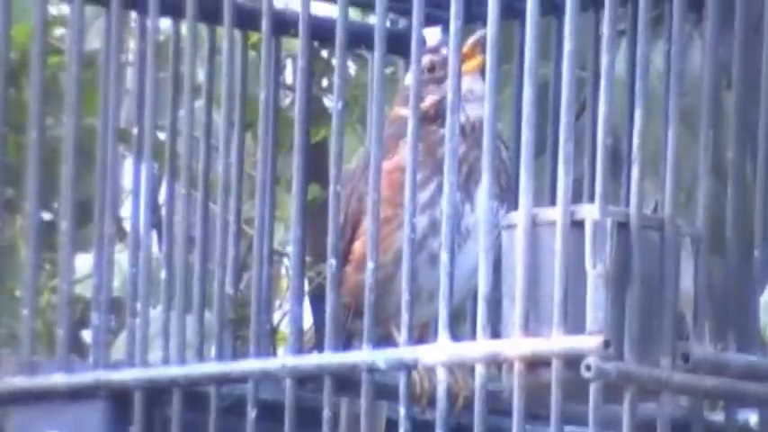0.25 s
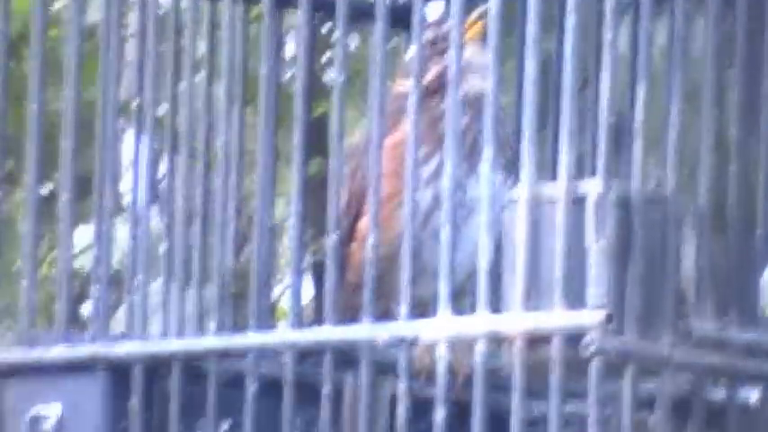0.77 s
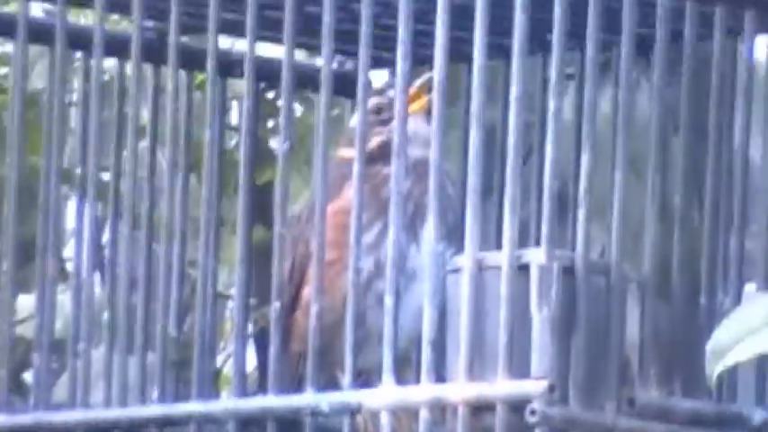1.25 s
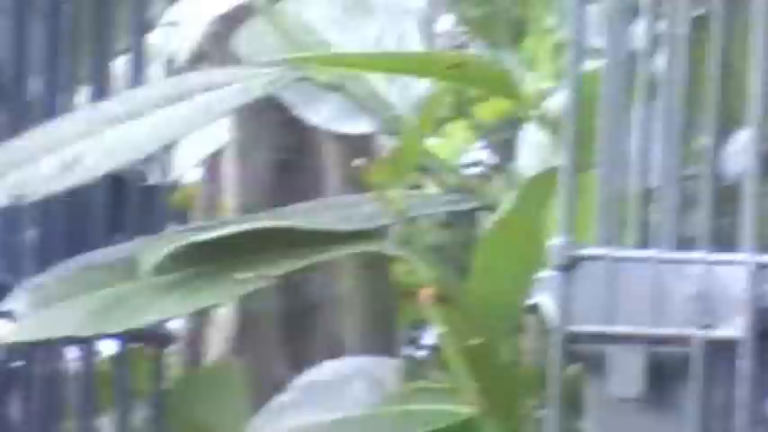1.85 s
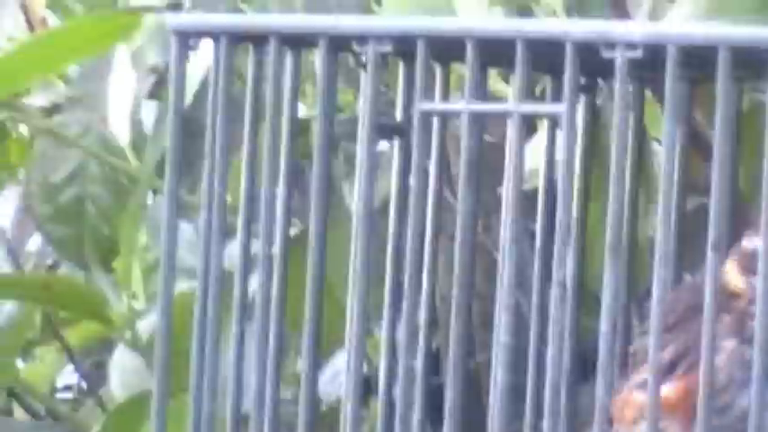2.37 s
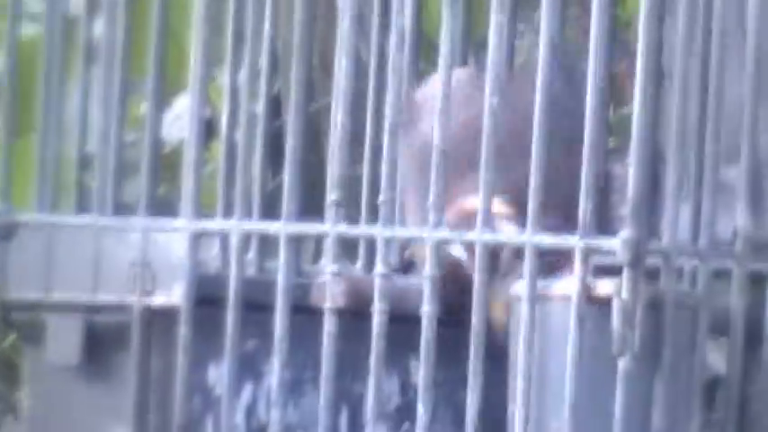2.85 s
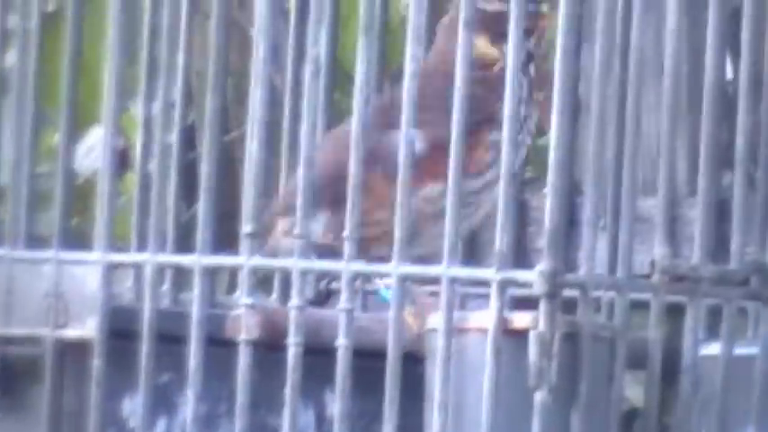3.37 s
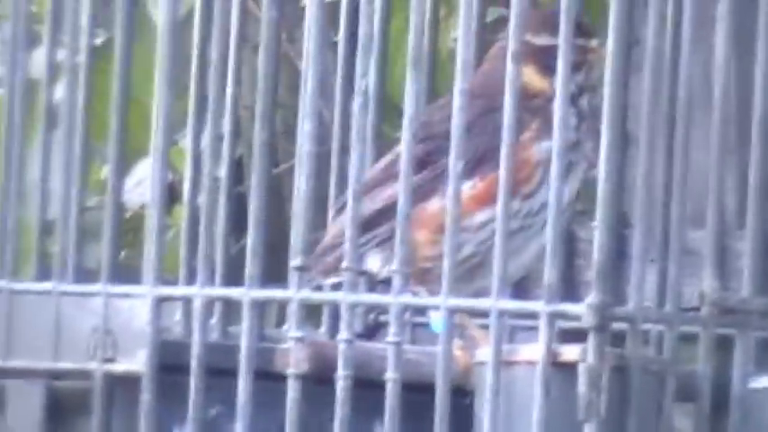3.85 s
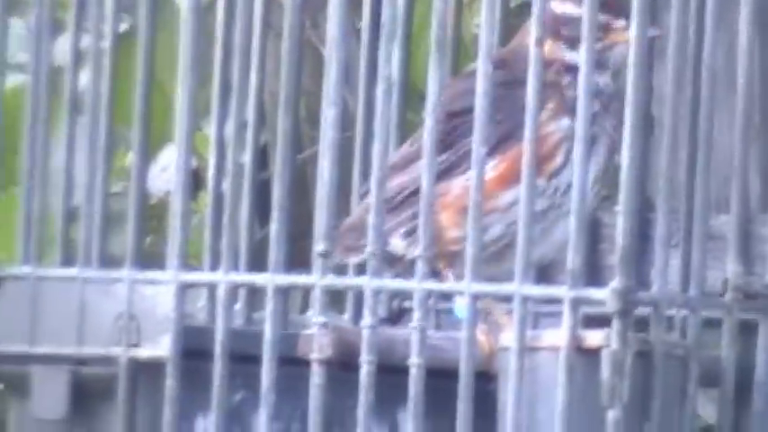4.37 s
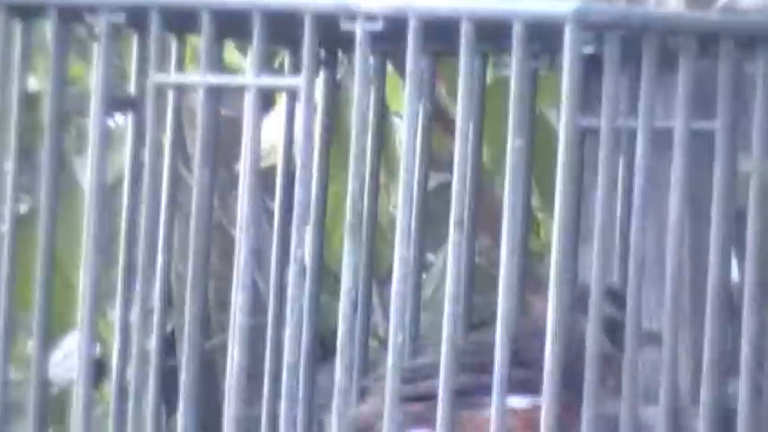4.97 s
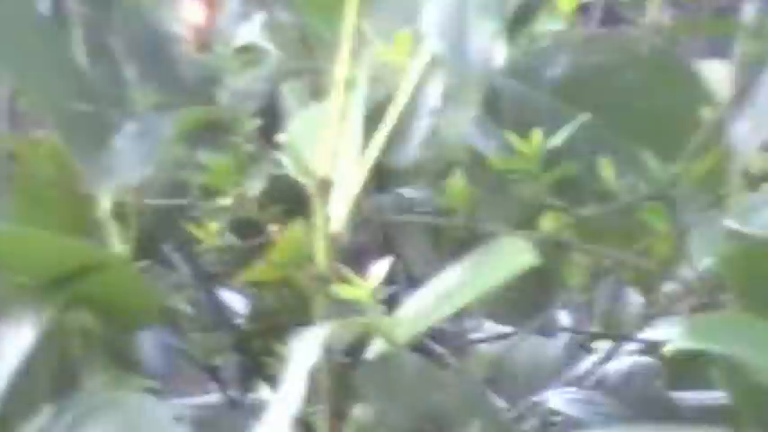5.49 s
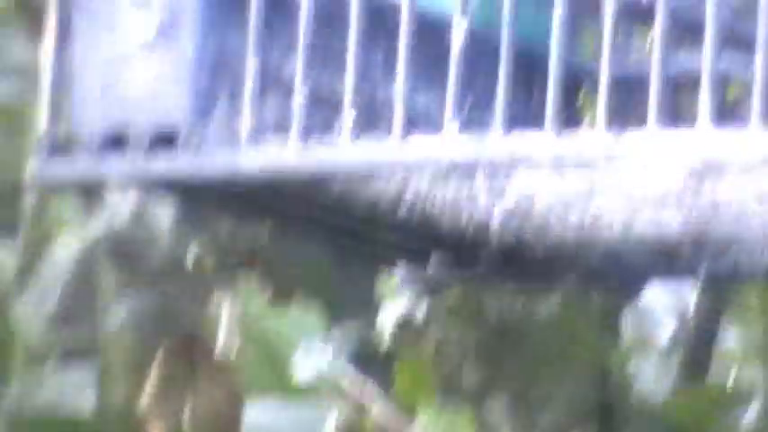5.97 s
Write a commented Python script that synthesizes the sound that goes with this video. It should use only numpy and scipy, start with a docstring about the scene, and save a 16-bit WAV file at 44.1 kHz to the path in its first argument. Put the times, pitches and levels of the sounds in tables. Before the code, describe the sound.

Caged thrushes among leaves near hard walls. A nasal call opens fast, squeaky, rasping twittering; a falling series of fluttering whistles joins after one second. A low purr breaks into pulses, claws tick on ringing wires, then a near-silent gap. A brief high looping trill, a distant chirp, and a louder, clearer falling whistle phrase follow. Close microphone, short echoes, faint rumble and hiss.

```python
"""A nasal call opens over a faint steady rumble and hiss: caged thrushes among leaves, close to hard walls.
One twitters fast, both sides of its syrinx gliding at once and modulating each other; then it purrs.
Two falling phrases of scooped whistles ring out, with a high looping trill between them.
Ringing wires tick under claws; a filtered-noise drone swells far off and one distant chirp answers.
Echoes and decaying noise tails place birds and cage near leaves and walls."""
import sys
import numpy as np
from scipy import signal
from scipy.fft import rfft, irfft
from scipy.io import wavfile
from scipy.ndimage import uniform_filter1d

SR = 44100
rng = np.random.default_rng(int(sys.argv[2]) if len(sys.argv) > 2 else 0)


def output_pcm(signal):
    """Save a mono or channel-first signal as 16-bit PCM at the path in sys.argv[1].

    Samples are clipped to [-1, 1] before scaling.
    """
    pcm = np.clip(np.atleast_2d(signal).T, -1, 1) * 32767
    wavfile.write(sys.argv[1], SR, np.round(pcm).astype(np.int16))


N = 274743
TIME = np.arange(N) / SR
CUTOFF_HZ = 15700
STEADY = np.zeros(N)   # no bend, no wobble


def from_db(db):
    """Decibels to gain."""
    return 10 ** (np.asarray(db) / 20)


def rms_one(x):
    """Scale to unit rms."""
    return x / np.sqrt(np.mean(x ** 2) + 1e-20)


def at_hz(points, hz):
    """Read a spectrum on a log-frequency axis."""
    freqs, values = np.transpose(points)
    return np.interp(np.log(np.maximum(hz, 1)), np.log(freqs), values)


def butter(order, hz, kind, x):
    """Shape a sound with a Butterworth filter."""
    return signal.sosfilt(signal.butter(order, hz, kind, fs=SR, output="sos"), x)


def drift(rate_hz):
    """Random wavering up to the given rate; spread 1."""
    noise = rng.standard_normal(N + 4000)
    return rms_one(butter(2, min(rate_hz, 5000), "low", noise)[4000:])   # skip the filter's start


def zigzag(rate_hz, unevenness=.3):
    """Muscle flutter: quick, uneven sweeps up and down."""
    uneven_rate_hz = rate_hz * np.exp(unevenness * drift(rate_hz))
    return np.sin(2 * np.pi * np.cumsum(uneven_rate_hz) / SR)


# how well throat and beak pass each partial: (frequency [Hz], level [dB])
THROAT_AND_BEAK = [(1600, -2.5), (2200, -6.5), (2800, 1.5), (5200, -3.5), (7500, 1), (8500, -1.5),
                   (10000, -14.5), (12000, -20), (15500, -33)]
# second to fifth partial, before each note's own overtone level: (level [dB])
PARTIALS_DB = [3, -1.5, -6.5, -9.5]


def syrinx(hz, level_db, overtone_db, even_db=0):
    """A vibrating membrane: a tone and overtones through throat and beak; a symmetric swing weakens even ones."""
    phase = 2 * np.pi * np.cumsum(hz) / SR
    out = from_db(at_hz(THROAT_AND_BEAK, hz)) * np.sin(phase)
    for k, db in enumerate(PARTIALS_DB, 2):
        partial_db = overtone_db + db + even_db * (k % 2 == 0) + at_hz(THROAT_AND_BEAK, k * hz)
        out += from_db(partial_db) * np.sin(k * phase) * (k * hz < CUTOFF_HZ)
    return np.sqrt(2) * from_db(level_db) * out


def add(out, start, end, hz0, hz1, db, swell_db, overtone_db, bend, wobble_db,
        even_db=0, arch=0, edge_s=0.0022):
    """Add one gliding note; arch lowers both ends, bend (log pitch) and wobble_db move it moment by moment."""
    span = slice(max(0, int((start - edge_s) * SR)), int((end + edge_s) * SR))
    t = TIME[span]
    along = np.clip((t - start) / (end - start), 0, 1)
    from_edge = np.minimum(t - start, end - t) + edge_s
    gate = np.sin(np.pi / 2 * np.clip(from_edge / (2 * edge_s), 0, 1)) ** 2
    hz = (hz0 + (hz1 - hz0) * along) * np.exp(bend[span] - arch * (2 * along - 1) ** 2)
    level_db = db + swell_db * (along - .5) + wobble_db[span]
    out[span] += gate * syrinx(hz, level_db, np.broadcast_to(overtone_db, N)[span], even_db)


# background spectrum, relative: (frequency [Hz], level [dB per Hz])
AIR_SPECTRUM = [(15, -43.5), (30, -14.5), (70, -2.5), (112, -5), (170, -2.5), (330, -10), (780, -6),
                (1500, -15.5), (2100, -17.5), (4500, -22.5), (7300, -21.5), (9000, -38), (12000, -45.5),
                (15500, -64)]
# how alike left and right are: (frequency [Hz], correlation [-1 to 1])
AIR_WIDTH = [(40, 0.94), (300, 0.011), (700, 0.31), (7000, 0.79)]


def air(level_db=-51):
    """Steady distant rumble and faint hiss: shaped noise, widest in the low middle."""
    hz = np.fft.rfftfreq(N, 1 / SR)
    mid, side = rfft(rng.standard_normal((2, N))) * from_db(at_hz(AIR_SPECTRUM, hz))
    alike = np.clip(at_hz(AIR_WIDTH, hz), -1, 1)
    stereo = np.sqrt(1 + alike) * mid + np.sqrt(1 - alike) * side * [[1], [-1]]
    return from_db(level_db) * rms_one(irfft(stereo, N))


def twitter(coupling=2.4):
    """Both sides of the syrinx sound at once and modulate each other into sum and difference tones."""
    rasps, flicks = rattles()
    low = rasps + soft_notes() + squawk() + purr()
    high = flicks + thin_notes()
    return low + high + coupling * butter(2, 8000, "low", low * high)


# nasal notes, pitches before the arch: (start [s], end [s], start pitch [Hz], end pitch [Hz],
# level [dB], swell [dB], undertone re note [dB], overtones [dB])
NASAL_CALLS = [(-.01, 0.028, 3957, 3704, -27, -8.5, -17.5, -15.5),
               (0.321, 0.482, 3348, 3323, -36, -2.5, -18, -17),
               (2.596, 2.712, 4084, 4177, -37.5, 17, -6.5, -24)]
# soft slurs, pitches before the arch: (start [s], end [s], start pitch [Hz], end pitch [Hz],
# mid-note level [dB], arch [log pitch, about share of pitch; below 0 it dips])
SOFT_SLURS = [(0.093, 0.133, 2820, 2640, -36.5, 0.016), (0.203, 0.217, 2820, 2800, -36.5, 0.052),
              (0.307, 0.486, 4534, 4895, -42.5, 0.011), (0.476, 0.541, 4974, 4960, -34.5, 0.019),
              (0.711, 0.749, 3600, 3290, -38, 0), (0.75, 0.855, 3222, 3050, -35.5, -0.035),
              (0.822, 0.915, 4660, 5000, -39.5, 0.047), (0.871, 0.932, 3600, 3764, -37.5, -0.12),
              (0.929, 0.993, 4337, 4260, -36, 0.051), (1.102, 1.199, 2760, 2667, -39, .06),
              (1.236, 1.352, 3663, 3575, -35, 0.031), (1.285, 1.353, 6340, 6400, -43.5, -0.013),
              (1.356, 1.428, 3856, 4110, -36.5, 0.034), (1.722, 1.795, 5710, 4650, -44.5, -.05)]


def soft_notes(jitter=0.013, shimmer_db=2.0, nasal_arch=0.0217, undertone_overtone_db=-14):
    """The lower side sings curved slurs; in nasal notes every second swing differs: an undertone an octave down."""
    out, shake, shimmer = np.zeros(N), jitter * drift(230), shimmer_db * drift(280)
    for *note, arch in SOFT_SLURS:
        add(out, *note, -5.5, -13, shake, shimmer, arch=arch, edge_s=0.0044)   # fades; few overtones
    for start, end, hz0, hz1, db, swell_db, undertone_db, overtone_db in NASAL_CALLS:
        add(out, start, end, hz0, hz1, db, swell_db, overtone_db, shake, shimmer, arch=nasal_arch, edge_s=.005)
        add(out, start, end, hz0 / 2, hz1 / 2, db + undertone_db, swell_db, undertone_overtone_db,
            shake, shimmer, arch=nasal_arch)
    return out


# runs of strokes: (first stroke [s], strokes [count], gap [s], rise [s], fall [s], flick level [dB],
# rasp delay [s], rasp length [s], rasp pitch [Hz], rasp level [dB],
# rasp growth [dB per stroke]; flicks grow half as much)
RATTLE_RUNS = [(0.092, 5, 0.028, 0.0027, .017, -40, 0.017, 0.014, 3131, -37, 1),
               (0.647, 3, 0.04, 0.0093, .02, -39.5, -0.0067, 0.022, 3334, -43, 2.5),
               (0.936, 2, .063, .004, .004, -47, -0.0035, 0.016, 2783, -40.5, -1),
               (1.058, 2, 0.032, 0.018, .01, -38, 0.0015, .028, 3084, -42.5, 6),
               (1.134, 3, .027, 0.014, 0.0078, -37, -.002, .032, 2954, -33.5, -5),
               (1.54, 2, 0.086, 0.011, 0.016, -39.5, .002, 0.038, 3210, -37.5, 1.5),
               (1.871, 5, .03, 0.025, .002, -46, -0.0014, .018, 3150, -43.5, 1.07)]


def rattles(sweep=0.1997, sweep_hz=70, rasp=0.021, shimmer_db=2.5, rasp_overtone_db=-8,
            flick_overtone_db=-13, flick_jitter=0.022, flick_arch=0.0406, uneven_pitch=0.0356):
    """In quick uneven strokes the upper side flicks up and down, the lower rasps; returns (lower, upper)."""
    foot_hz, top_hz = 3600, 7375   # before the arch
    low, high = np.zeros((2, N))
    shake = sweep * zigzag(sweep_hz) + rasp * drift(850)
    shimmer = shimmer_db * drift(300)
    tremble = flick_jitter * drift(370) + uneven_pitch * drift(19)
    for first, count, gap, rise, fall, flick_db, delay, length, hz, rasp_db, growth_db in RATTLE_RUNS:
        for k in range(round(count)):
            at, gain_db = first + k * gap, k * growth_db
            stroke_db = flick_db + gain_db / 2
            add(high, at - rise, at, foot_hz, top_hz, stroke_db, 0, flick_overtone_db,
                tremble, shimmer, arch=flick_arch)
            add(high, at, at + fall, top_hz, foot_hz, stroke_db, 0, flick_overtone_db,
                tremble, shimmer, arch=flick_arch)
            middle = at + delay
            add(low, middle - length / 2, middle + length / 2, hz, hz, rasp_db + gain_db, 0,
                rasp_overtone_db, shake, shimmer, edge_s=.004)
    return low, high


# (start [s], end [s], start pitch [Hz], end pitch [Hz], level [dB], warble [0-1])
THIN_WHISTLES = [(.295, .541, 8230, 7310, -41, 0.11), (.698, .751, 7800, 7740, -40.5, 0.1),
                 (.808, .984, 8240, 7260, -38.5, 0.05), (1.062, 1.222, 7620, 7920, -43, .25),
                 (1.224, 1.43, 7580, 7170, -43, 0), (1.545, 1.645, 7710, 7280, -38.5, 0.04),
                 (1.704, 1.872, 7477, 7310, -39, 0), (1.873, 1.997, 7390, 7760, -44.5, 0)]


def thin_notes(warble_depth=0.19, warble_hz=44, shimmer_db=1, overtone_db=-10):
    """The upper side holds very high, nearly pure tones."""
    out, warble, shimmer = np.zeros(N), warble_depth * zigzag(warble_hz), shimmer_db * drift(98)
    for *note, amount in THIN_WHISTLES:
        add(out, *note, 0, overtone_db, amount * warble, shimmer)
    return out


# turning points of the squawk: (start [s], lowest point [s], end [s])
SQUAWK_TIMES = (.564, .6, .641)


def squawk(roughness=0.047, level_db=-38.5, overtone_db=1, swell_db=3):
    """One hoarse note, rich in overtones, dives and climbs again."""
    turn_hz = (3470, 2003, 3210)   # pitch at the turning points, before roughness
    out, shake = np.zeros(N), roughness * drift(300)
    for start, end, hz0, hz1 in zip(SQUAWK_TIMES, SQUAWK_TIMES[1:], turn_hz, turn_hz[1:]):
        add(out, start, end, hz0, hz1, level_db, swell_db, overtone_db, shake, STEADY)
    return out


# whistles of the two falling phrases, each a run of scoops:
# (first scoop [s], scoops [count], gap [s], lengthening of last gap [share], pitch [Hz],
# sag [share of pitch], mid-note level [dB], scoop depth [share of pitch])
PHRASE_WHISTLES = [(1.003, 5, 0.02, 0.32, 4286, -0.12, -33.5, 0.29),
                   (1.198, 6, .018, 0.0048, 3835, 0.076, -30.5, 0.23),
                   (1.385, 6, .018, 0.062, 3480, 0.011, -29.5, 0.22),
                   (1.593, 5, 0.019, 0, 3314, -0.011, -25.5, 0.29),
                   (1.758, 6, .0176, 0.96, 2869, -0.013, -27.5, .27),
                   (1.96, 6, .0176, 0.91, 2657, 0.11, -28.5, .24),
                   (5.259, 5, 0.013, .15, 4003, 0.022, -26, .11),
                   (5.394, 3, .037, 0.045, 3627, 0.098, -23, .15),
                   (5.558, 3, .0378, 0.093, 3262, 0.038, -21.5, .22),
                   (5.723, 3, 0.038, 0.075, 3034, 0.059, -20.5, 0.25),
                   (5.895, 3, 0.039, 0.0095, 2842, 0.041, -19.5, 0.2),
                   (6.071, 3, .038, 0.025, 2650, 0.076, -20, 0.21),
                   (6.237, 3, .038, 0, 2506, 0.052, -23, 0.16)]


def falling_phrases(jitter=0.0072, slack_db=-28, overtone_db=-25, slack_overtone_db=50, even_db=-6,
                    press_db=30, press_hz=3100, loud_db=-21, loud_brightens=0.64,
                    lead=.07, lead_s=0.00554, uneven_depth=.1):
    """Loud stepwise-falling whistles; in each scoop the membrane slackens: lower, weaker, reedier."""
    usual_gap_s, scoop_half_s = .03, .0055   # scoop and final hold last longer when the beat is slower
    before_s, hold_s, swell_db = .012, 0.0207, 5.5   # before first scoop, after last; growth over the note
    out, shake, whim = np.zeros(N), jitter * drift(130), np.exp(uneven_depth * drift(15.4))
    for first, count, gap, slowing, hz, sag, db, depth in PHRASE_WHISTLES:
        gaps = gap * (1 + slowing * np.linspace(0, 1, round(count) - 1) ** 3)
        scoops = first + np.append(0, np.cumsum(gaps))
        start = first - before_s
        end = scoops[-1] + hold_s * np.sqrt(gaps[-1] / usual_gap_s)
        nearest = np.searchsorted((scoops[1:] + scoops[:-1]) / 2, TIME)
        from_scoop = TIME - scoops[nearest]
        closeness = np.exp(-np.minimum((from_scoop / scoop_half_s) ** 2 * usual_gap_s / gap, 20))
        slack = depth * whim * closeness
        entry = lead * np.exp(-np.clip((TIME - start) / lead_s, 0, 20))   # slides in from above
        # high and loud notes are brighter
        pressed_db = press_db * np.log(hz / press_hz) + loud_brightens * (db - loud_db)
        add(out, start, end, hz * (1 + sag / 2), hz * (1 - sag / 2), db, swell_db,
            overtone_db + pressed_db + slack_overtone_db * slack,
            np.log(1 - slack) + entry + shake, slack_db * slack, even_db, edge_s=0.0036)
    return out


# stages of the purr: (start [s], breaks into pulses [s], end [s])
PURR_TIMES = (2.24, 2.379, 2.482)
# buzzing tones above it, before arch and fade: (pitch [Hz], level [dB])
PURR_BUZZES = [(4870, -48.5), (3970, -52.5)]


def purr(overtone_db=-23, chop_db=28, pulse_bend=0.0412, buzz_depth=0.038, buzz_hz=65,
         buzz_fade_db=-4, buzz_shimmer_db=3, arch=0.065):
    """A quiet low note swells under two buzzing tones, then breaks into pulses."""
    base_hz, level_db, swell_db, pulses_per_s = 2427, -31.5, 18.5, 30.3
    out, (start, breaks, end) = np.zeros(N), PURR_TIMES
    closed = np.sin(np.pi * np.maximum(TIME - breaks, 0) * pulses_per_s) ** 2
    effort_db = np.interp(TIME, [start, breaks], [-swell_db, 0]) - chop_db * closed ** 2
    add(out, start, end, base_hz * (1 + pulse_bend), base_hz, level_db, 0, overtone_db,
        pulse_bend * (closed - 1), effort_db)
    for hz, db in PURR_BUZZES:
        add(out, start, (breaks + end) / 2, hz, hz, db, buzz_fade_db, -30,
            buzz_depth * zigzag(buzz_hz), buzz_shimmer_db * drift(170), arch=arch, edge_s=0.014)
    return out


# claws on the cage: (time [s], level before touch and mode levels [dB])
CLAW_TICKS = [(2.5213, -32.5), (2.736, -34), (2.7539, -35)]
# ringing modes of the wires: (frequency [Hz], level [dB], 60 dB decay [s])
CAGE_MODES = [(4470, 3, .03), (5000, 4, 0.024), (6670, 7.5, 0.0066)]


def claws(touch_db=-6):
    """Each touch sets the cage wires ringing briefly, their balance varying at random."""
    out, t = np.zeros(N), TIME[:SR // 10]
    onset = 1 - np.exp(-t / 0.00034)
    for s, db in CLAW_TICKS:
        at = int(s * SR)
        for hz, mode_db, t60 in CAGE_MODES:
            ring_db = touch_db + db + mode_db + rng.normal(0, 2.1) - 60 * t / t60
            out[at:at + len(t)] += from_db(ring_db) * np.sin(2 * np.pi * hz * t) * onset
    return out


def far_drone(level_db=-59, peak_s=4.9, spread_s=0.63):
    """A low drone of band-passed noise swells and fades in the distance."""
    band = butter(2, [150, 215], "band", rng.standard_normal(N))
    return from_db(level_db) * np.exp(-((TIME - peak_s) / spread_s) ** 2) * rms_one(band)


# one loop, trough to trough, before smoothing and effort: (share of loop [0-1], pitch [Hz], level [dB])
LOOP_SHAPE = [(0, 2524, -33), (0.059, 3006, -37), (.15, 5680, -4.5), (0.331, 6533, -3), (0.521, 7045, -2),
              (0.611, 8250, -16.5), (0.699, 7200, -5.5), (.82, 6475, -0.5), (0.938, 3083, -27.5),
              (1.001, 2587, -13)]
# moments of the troughs: (time [s])
LOOP_TROUGHS = [4.35, 4.418, 4.477, 4.539, 4.61, 4.682, 4.726, 4.789]
# effort over the trill, added to the loop: (time [s], level [dB], pitch [factor])
TRILL_EFFORT = [(4.359, -76, 1.43), (4.366, -31, 1.17), (4.377, -33.5, 1.05), (4.394, -24, 1.04),
                (4.411, -28.5, 1.02), (4.445, -20, 1.017), (4.658, -22.5, 1), (4.7, -25.5, 0.93),
                (4.732, -32.5, 0.78), (4.738, -70, 1.3)]


def trill(overtone_db=-27, jitter=0.013):
    """The pitch loops up to a thin peak and plunges, about sixteen times a second."""
    s, db, factor = np.transpose(TRILL_EFFORT)
    span = slice(int(s[0] * SR), int(s[-1] * SR))
    t, out = TIME[span], np.zeros(N)
    along = np.interp(t, LOOP_TROUGHS, np.arange(len(LOOP_TROUGHS))) % 1
    share, loop_hz, loop_db = np.transpose(LOOP_SHAPE)
    dip_db = np.interp(along, share, loop_db)
    smooth_hz = uniform_filter1d(np.interp(along, share, loop_hz), size=100)
    hz = smooth_hz * np.interp(t, s, factor) * (1 + jitter * drift(230)[span])
    # the troughs are weak and reedy
    out[span] = syrinx(hz, np.interp(t, s, db) + dip_db, overtone_db - dip_db)
    return out


def far_chirp(level_db=-49):
    """A distant bird gives one arched note."""
    out = np.zeros(N)
    add(out, 5.078, 5.115, 2200, 1950, level_db, 0, -20, STEADY, STEADY, arch=0.26)
    return out


# echoes from near surfaces: (delay [s], level [dB])
NEAR_ECHOES = [(.0023, -16.5), (.0057, -13), (0.0114, -19)]


def surroundings(x, early_width=0.14, late_width=0.18, treble_width=5, wide_hz=8000):
    """Near surfaces echo, leaves and bars scatter, the walls leave a short tail."""
    t = TIME[:int(.7 * SR)]
    response = np.zeros((2, len(t)))
    # scatter, then walls: (60 dB decay [s], level [dB], width)
    for t60, db, width in [(0.036, -5, early_width), (0.5, -8.5, late_width)]:
        mid, side = rng.standard_normal((2, len(t)))
        # the top scatters more widely
        side = side + treble_width * butter(6, wide_hz, "high", rng.standard_normal(len(t)))
        decay = from_db(-60 * t / t60) * (1 - np.exp(-t / 0.011))
        stereo = mid + width * side * [[1], [-1]]
        response += from_db(db) * stereo * decay / np.linalg.norm(decay)
    for delay, db in NEAR_ECHOES:
        response[:, int(delay * SR)] += from_db(db)
    return x + signal.fftconvolve(x[None], response, axes=1)[:, :N]


# where birds and cage stand as the microphone turns: (time [s], left minus right [dB])
STEREO_BEARING = [(.8, -1), (1.2, 2), (2.8, 3.5), (4.2, .3)]


def scene():
    """Birds and cage in their surroundings, over the background."""
    birds = twitter() + falling_phrases() + trill() + far_chirp()
    pan = from_db(np.interp(TIME, *np.transpose(STEREO_BEARING)) / 2 * [[1], [-1]])
    return pan * surroundings(birds + claws()) + air() + far_drone()


def record(dry):
    """The top is cut steeply."""
    return signal.sosfilt(signal.ellip(10, .1, 80, CUTOFF_HZ, fs=SR, output="sos"), dry)


dry = scene()
out = record(dry)
output_pcm(out)
```